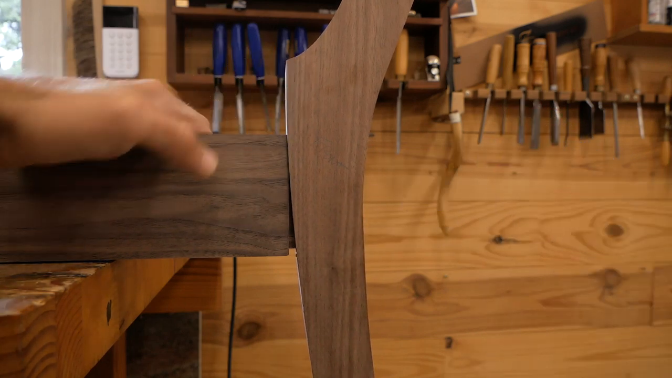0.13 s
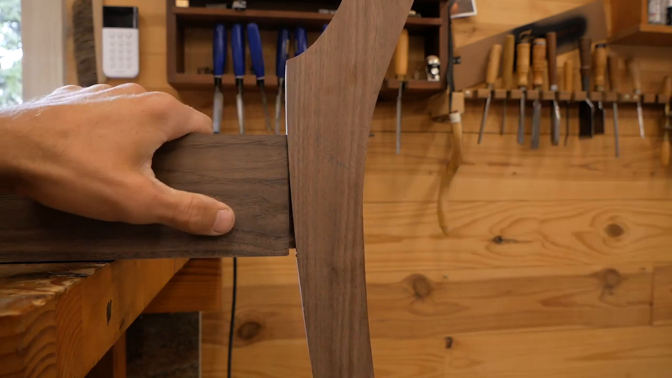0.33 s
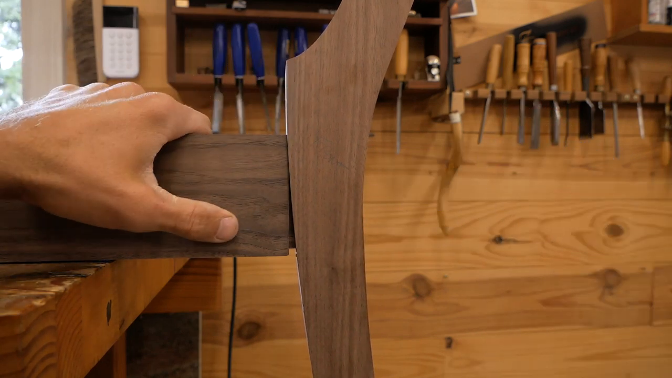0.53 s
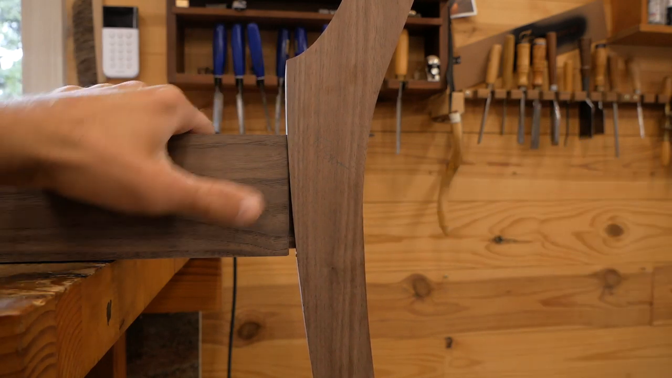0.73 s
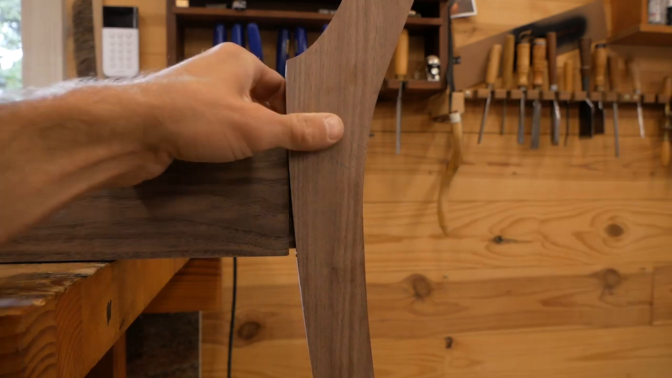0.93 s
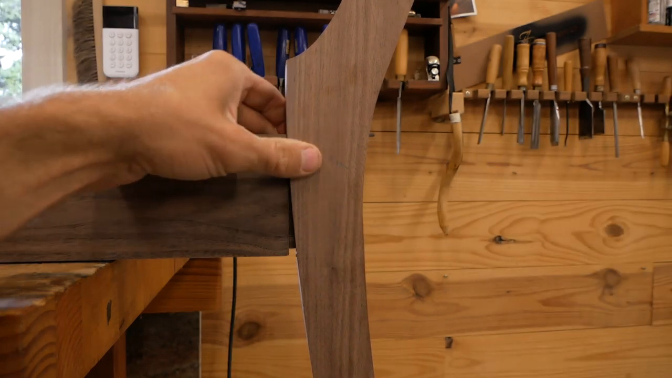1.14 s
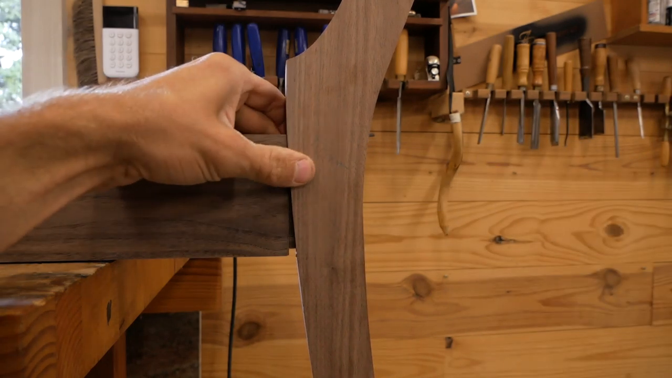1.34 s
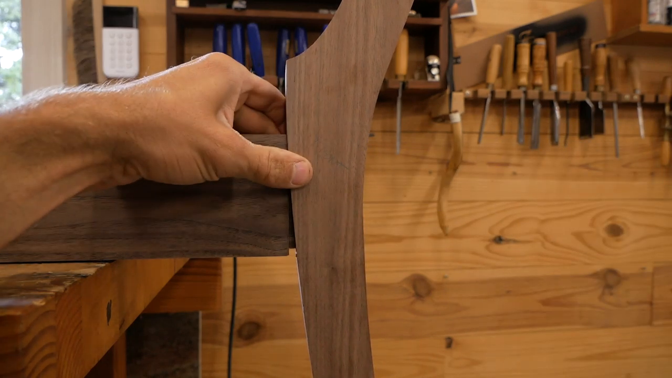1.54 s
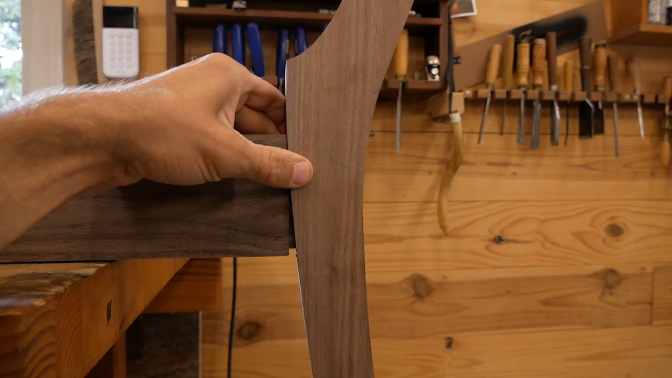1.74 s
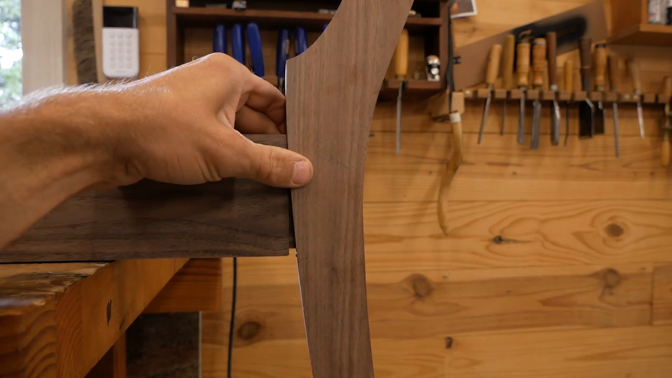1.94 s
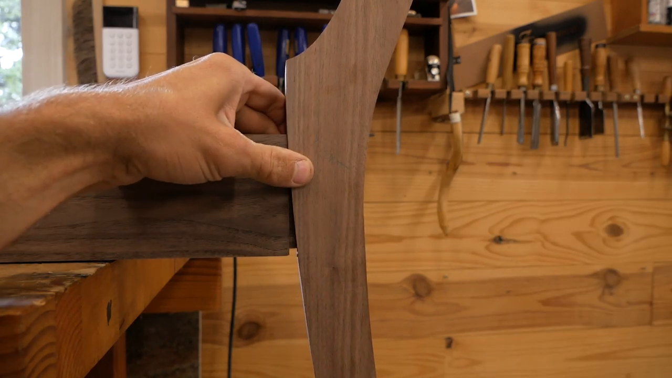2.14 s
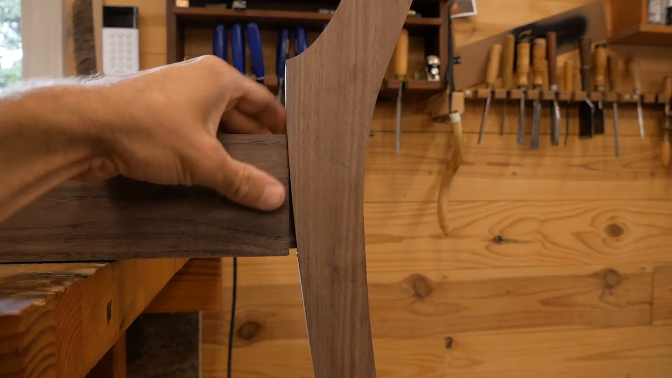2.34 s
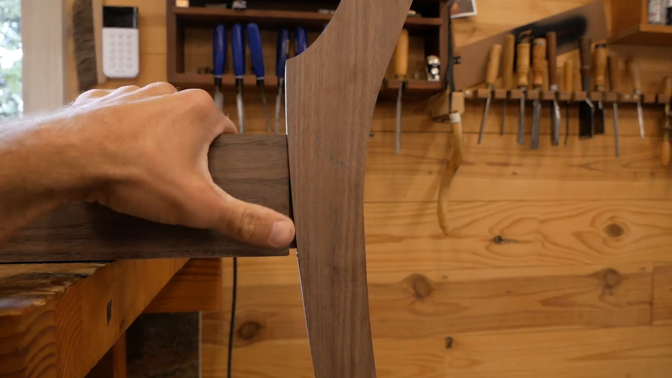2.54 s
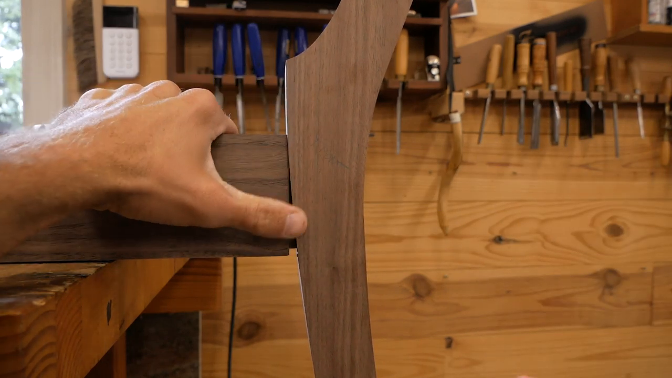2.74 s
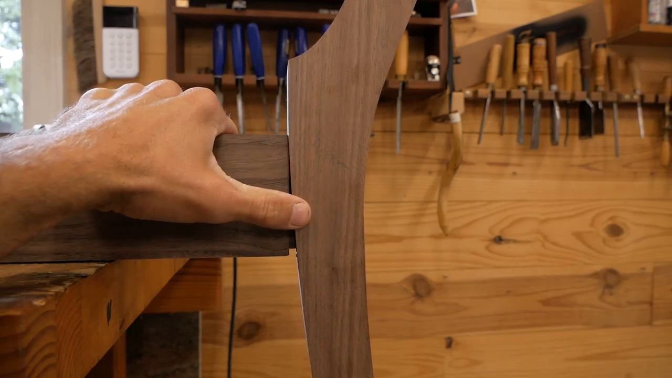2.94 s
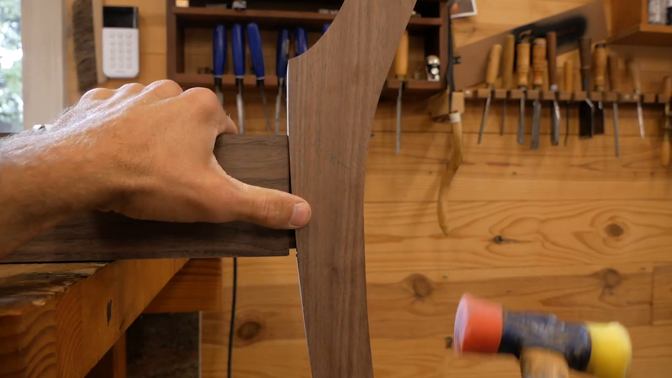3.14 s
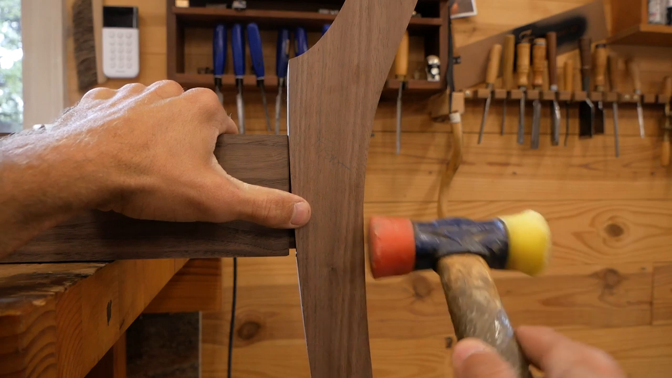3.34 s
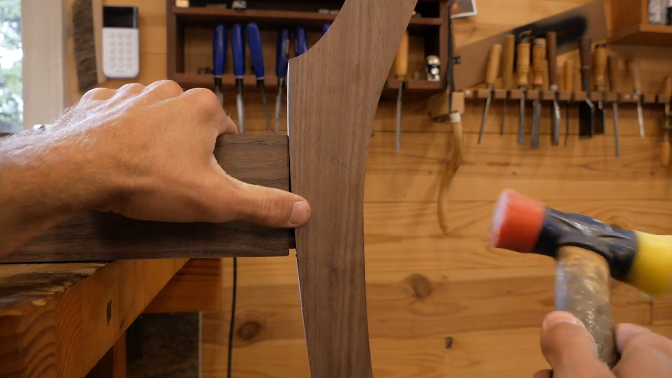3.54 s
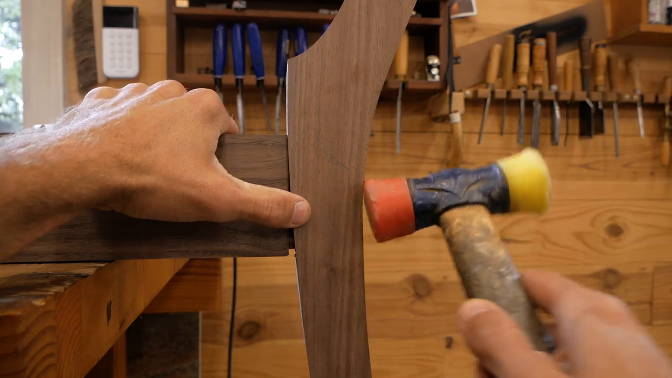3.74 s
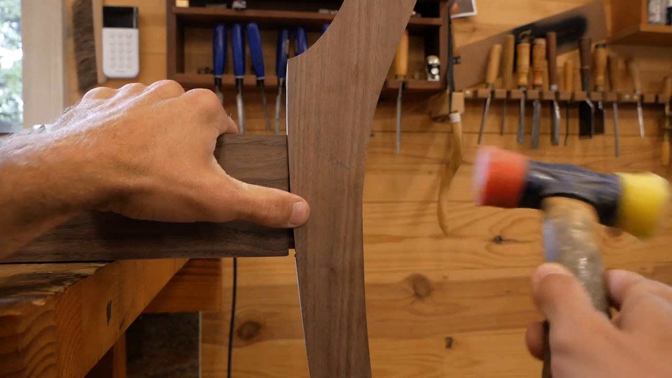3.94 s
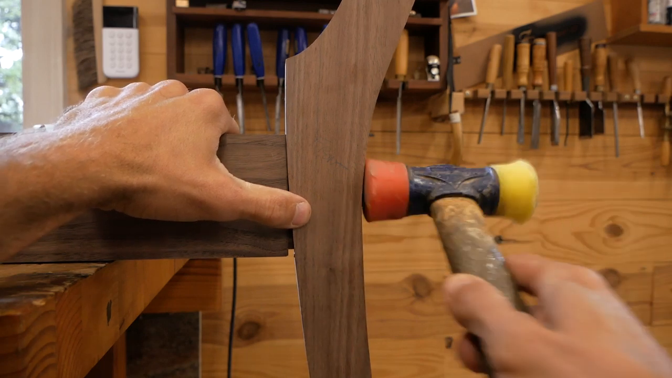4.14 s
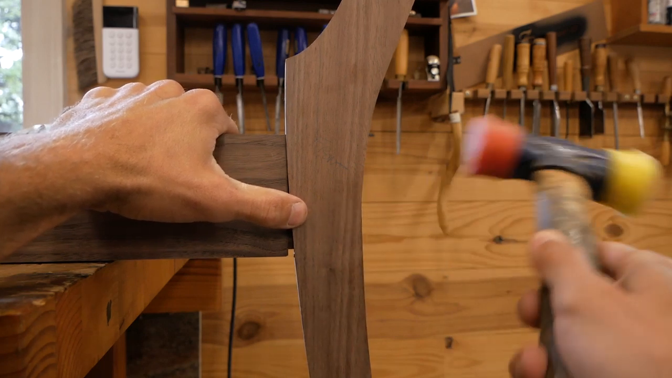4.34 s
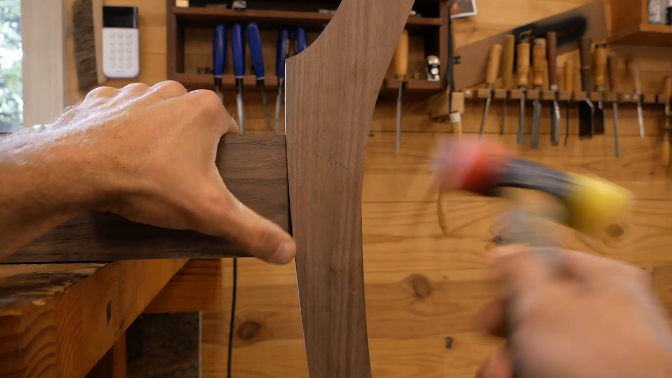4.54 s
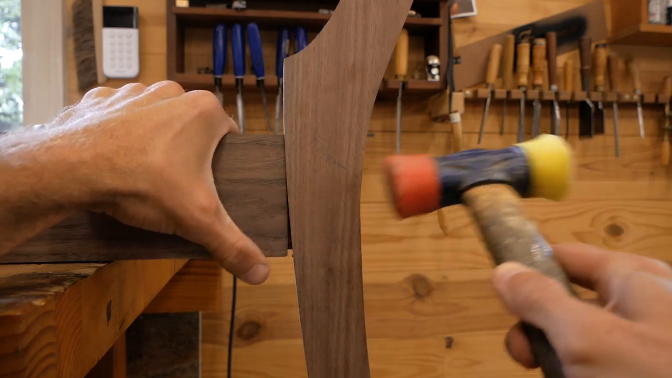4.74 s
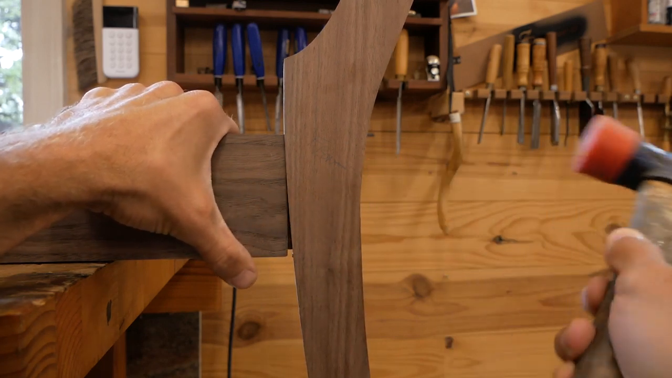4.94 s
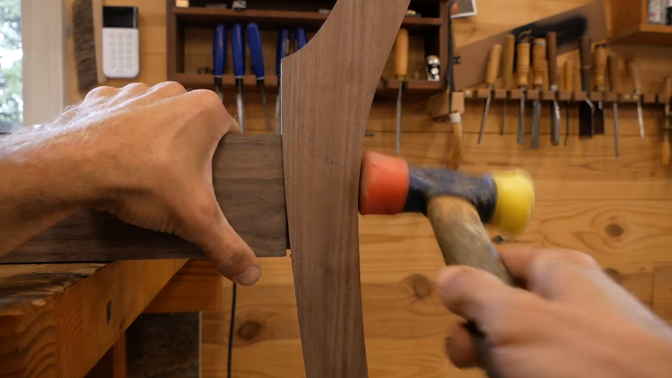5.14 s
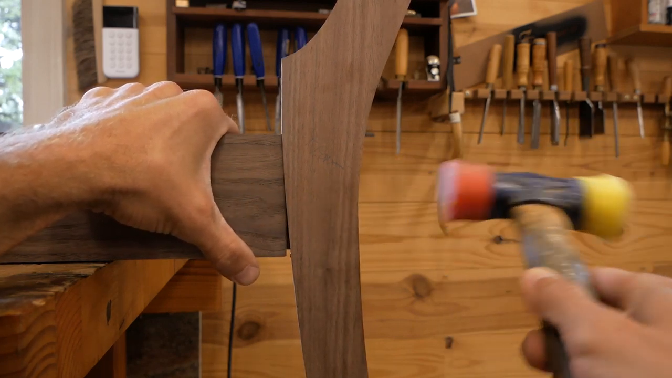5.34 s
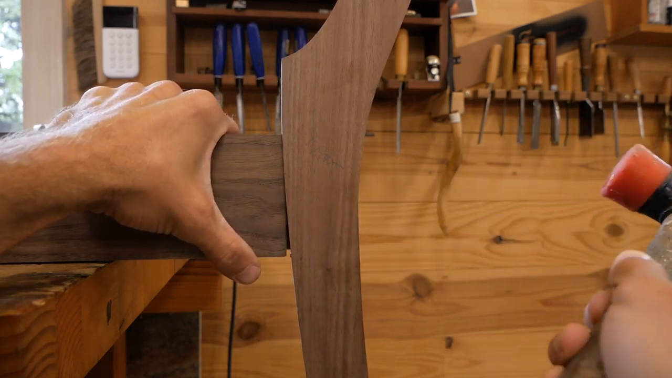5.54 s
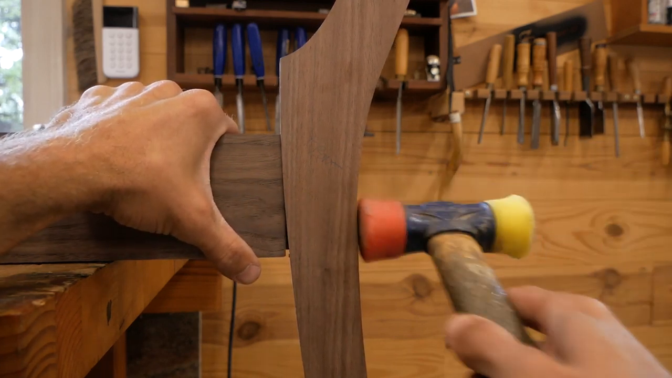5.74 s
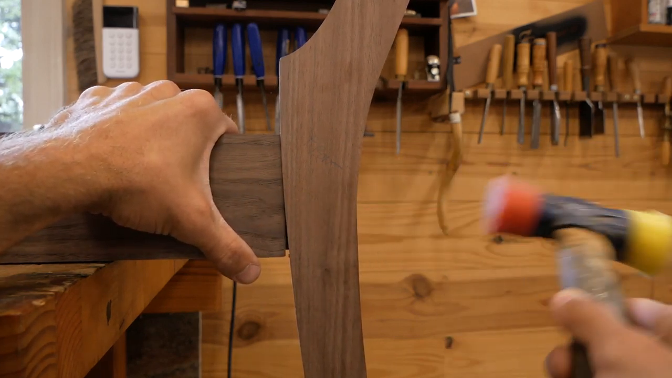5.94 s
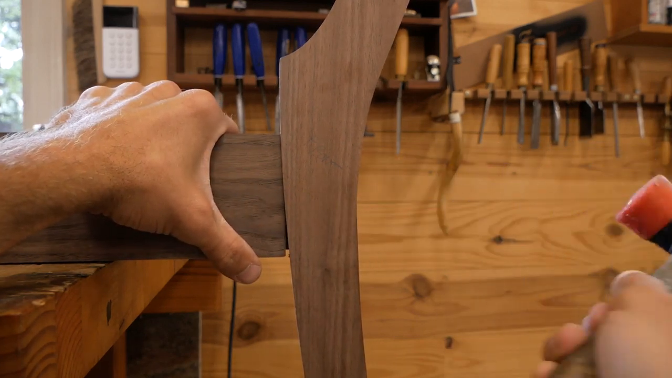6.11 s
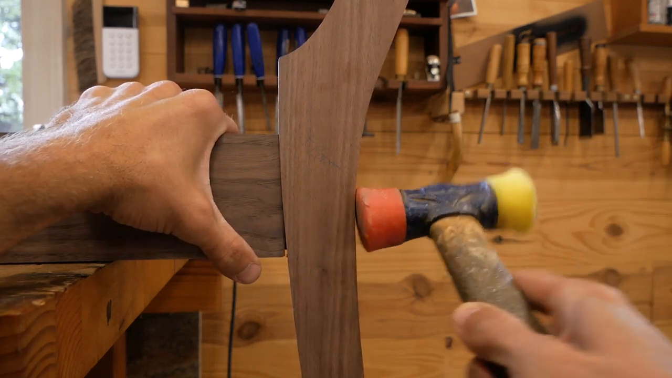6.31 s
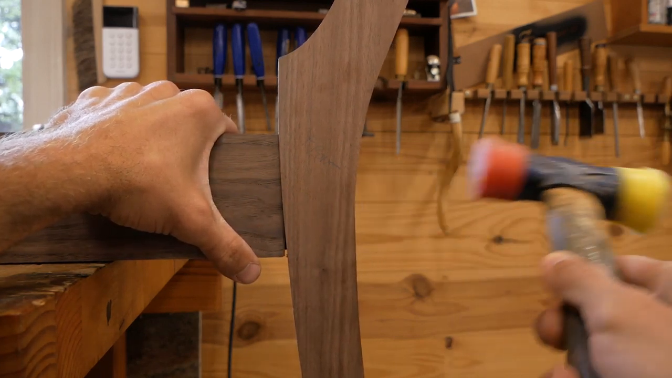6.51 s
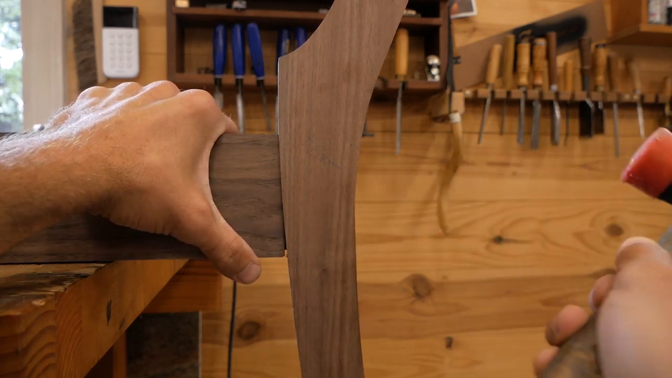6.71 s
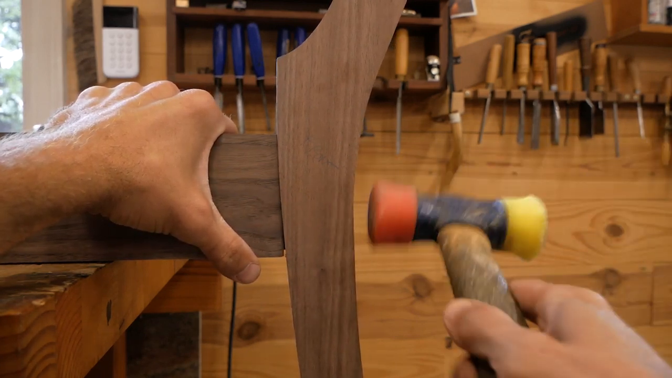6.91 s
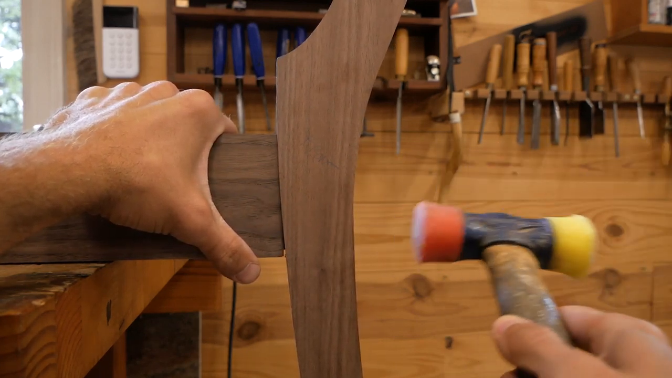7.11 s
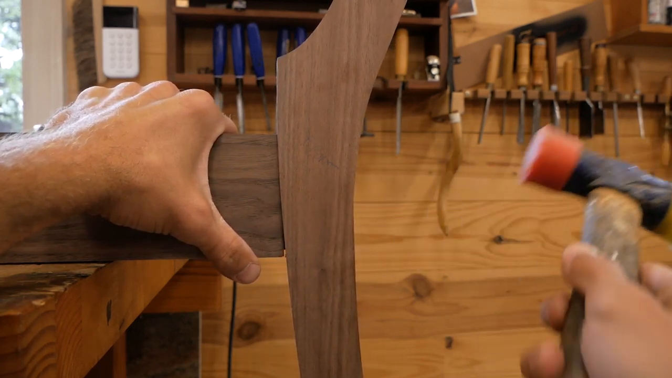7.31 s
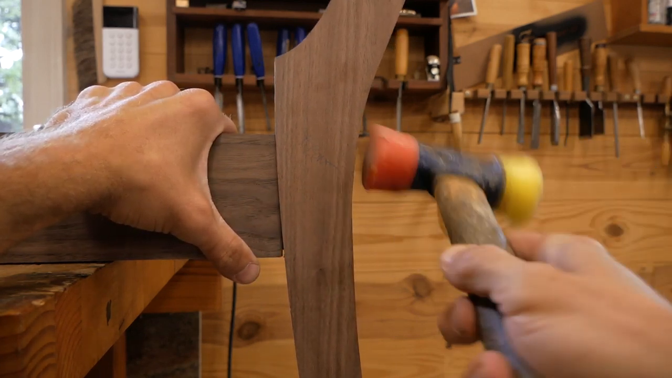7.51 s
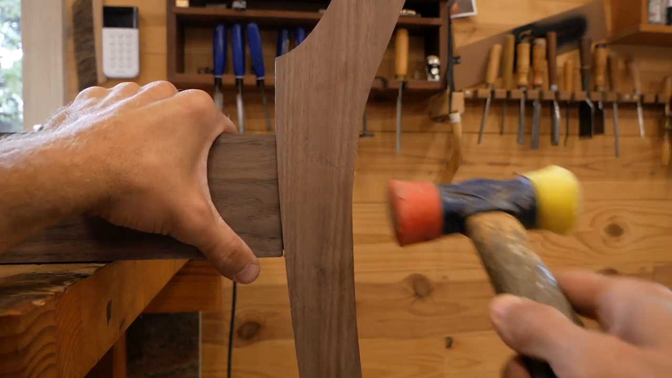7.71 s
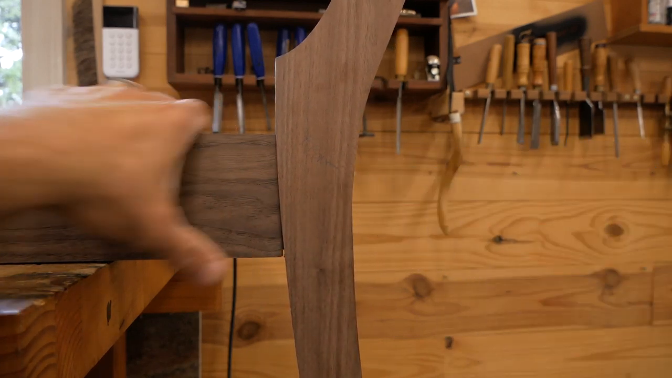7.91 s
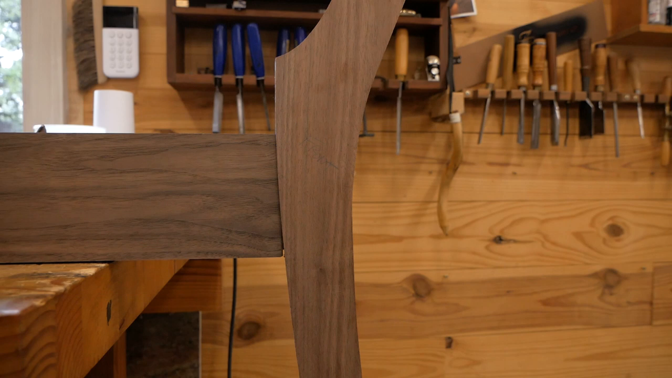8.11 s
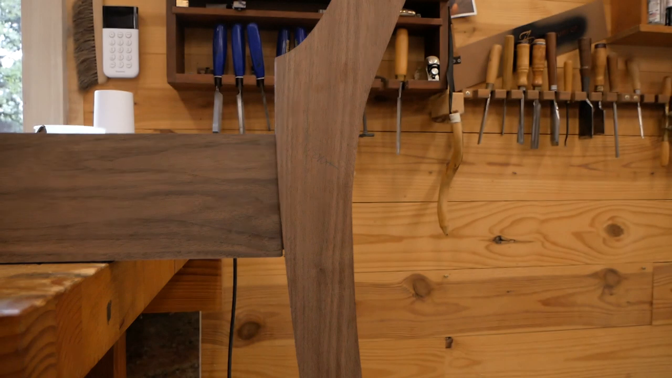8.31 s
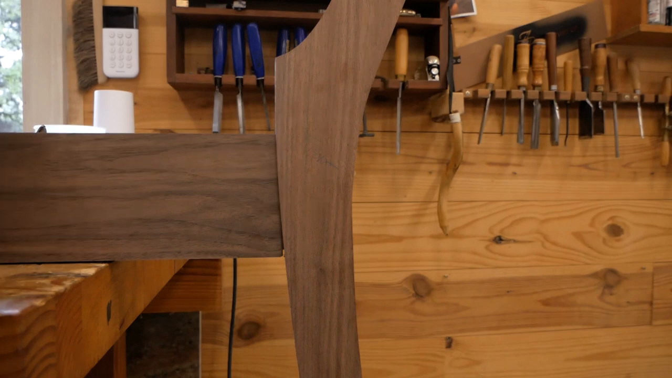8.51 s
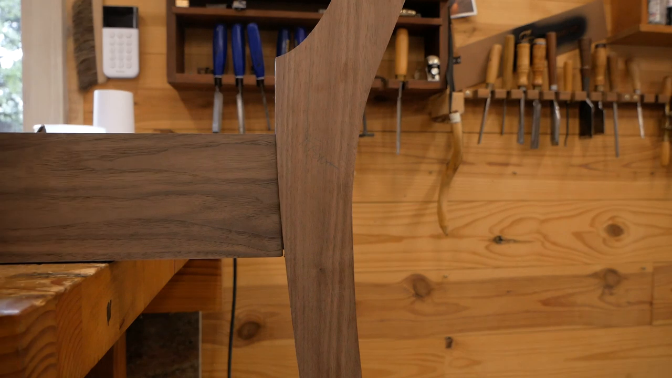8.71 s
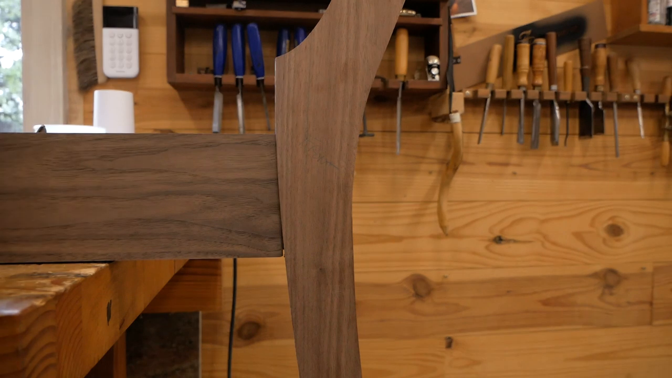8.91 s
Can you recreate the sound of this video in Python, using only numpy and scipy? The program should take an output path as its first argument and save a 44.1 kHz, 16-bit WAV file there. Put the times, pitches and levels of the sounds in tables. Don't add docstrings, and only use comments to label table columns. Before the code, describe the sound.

Skin hisses and ticks on wood, then twelve resonant mallet knocks with dull rebounds ring through timber and bench, ending in more hand rubbing.

```python
import sys
import numpy as np
from scipy import signal
from scipy.fft import rfft, irfft, next_fast_len
from scipy.io import wavfile
from scipy.ndimage import uniform_filter1d

SR = 44100
rng = np.random.default_rng(int(sys.argv[2]) if len(sys.argv) > 2 else 0)


def file_out(sig):
    cols = np.atleast_2d(sig).T
    lim = np.clip(cols, -1, 1)
    pcm = np.round(lim * 32767).astype(np.int16)
    wavfile.write(sys.argv[1], SR, pcm)


def invert_db(level):
    return 10 ** (np.asarray(level, dtype=float) / 20)


N = 399546


def evened(x):
    return x / np.sqrt(np.mean(x ** 2) + 1e-20)


def read(points, hz):
    f, value = np.transpose(points)
    return np.interp(np.log(hz + 1), np.log(f + 1), value)


def add(mix, s, sound):
    part = mix[round(s * SR):][:len(sound)]
    part += sound[:len(part)]


def colour(x, points):
    size = next_fast_len(len(x))
    gain = invert_db(read(points, np.fft.rfftfreq(size, 1 / SR)))
    return irfft(rfft(x, size) * gain, size)[:len(x)]


def noise(points, patchy_db):
    a, b, patches = rng.standard_normal((N // 128 + 6, 257, 3)).T
    patches = uniform_filter1d(patches, size=8, axis=0)
    patches = evened(uniform_filter1d(patches, size=12, axis=1))
    colour_db = read(points, np.fft.rfftfreq(512, 1 / SR))[:, None]
    z = (a + 1j * b) * invert_db(colour_db + patchy_db * patches)
    return evened(signal.istft(z, nperseg=512, noverlap=384)[1][:N])


def ring(modes, t, rise_cycles):
    hz, db, t60 = modes.T[:, :, None]
    sign = (-1) ** np.arange(len(hz))[:, None]
    rise = 1 - np.exp(-t * hz / rise_cycles)
    tones = sign * invert_db(db - 60 * t / t60) * rise * np.sin(2 * np.pi * hz * t)
    return tones.sum(0)


# (frequency [Hz], level [dB per Hz])
AIR_COLOUR = [(20, -28.5), (40, -17.5), (65, -3), (120, -5), (200, -2.5), (400, -9), (650, -7),
              (1000, -14.5), (1500, -20.5), (3000, -25), (8000, -28.5), (14000, -30.5), (15500, -37),
              (16500, -68)]
# (frequency [Hz], level [dB])
AIR_WIDTH = [(60, -19.5), (180, -28.5), (550, -19.5), (1650, -11), (4970, -3.5), (15000, -3.5)]


def quiet_background():
    air_db = -67
    differing = invert_db(air_db) * colour(noise(AIR_COLOUR, patchy_db=.5), AIR_WIDTH)
    shared = invert_db(air_db) * noise(AIR_COLOUR, patchy_db=.8)
    return shared, differing


# (frequency [Hz], time to fall 60 dB [s])
ROOM_DECAY = [(100, 0.39), (300, 0.46), (700, 0.38), (1800, 0.43), (4800, 0.32), (9000, 0.5),
              (14000, 0.076)]
# (frequency [Hz], level [dB])
WALL_COLOUR = [(100, 14.5), (400, -4), (1000, -8), (3000, -5), (8000, -23), (14000, -32.5)]


def workshop(x):
    out, turn = np.zeros(N), np.arange(N) / SR * 1.7
    fading = invert_db(-60 * np.arange(SR) / SR / 0.38)
    for k in range(3):
        taps = np.zeros(SR)
        at = np.arange(140, SR - 20, 20)
        taps[at + rng.integers(0, 20, len(at))] = rng.choice([-1., 1.], len(at))
        hz, t, z = signal.stft(taps, SR, nperseg=256)
        tail_db = read(WALL_COLOUR, hz)[:, None] - 60 * t / read(ROOM_DECAY, hz)[:, None]
        tail = signal.istft(z * invert_db(tail_db), SR, nperseg=256)[1]
        share = np.sqrt(2 / 3) * np.cos(np.pi * (turn + k / 3))
        out += signal.fftconvolve(x * share, tail / np.linalg.norm(taps * fading))[:N]
    return out


# (start [s], length [s], hiss level [dB], dull drag level [dB])
STROKES = [(-.05, 0.38, -63, -65), (.33, 0.11, -71, -75), (0.453, 0.096, -61.5, -62.5),
           (0.556, 0.053, -70, -69), (0.655, 0.24, -62.5, -65.5), (0.909, 0.081, -57.5, -62),
           (1.065, 0.15, -66.5, -62), (1.217, 0.076, -66.5, -66), (1.284, 0.28, -75, -67),
           (2.285, 0.13, -72.5, -65), (2.403, 0.079, -67, -72), (2.48, 0.14, -75, -66.5),
           (3.59, .09, -68.5, -65), (6.123, 0.081, -73.5, -78), (7.86, 0.31, -65, -62),
           (8.035, 0.079, -60, -60), (8.119, 0.099, -56, -60), (8.227, 0.25, -59.5, -65),
           (8.49, 0.098, -60.5, -64), (8.583, 0.056, -58, -67), (8.644, 0.14, -69.5, -66.5),
           (8.79, 0.13, -75, -72), (8.941, 0.063, -69, -62), (9.02, .1, -70.5, -77.5)]


def strokes(column, lift_s):
    grip_s, linger_db, linger_s = .022, -9, .06
    restless_db = 1.2
    t, power = np.arange(0, N + 64, 64) / SR, 0
    for row in STROKES:
        start, length = row[:2]
        rise = np.exp(np.minimum(t - start - grip_s, 0) / grip_s)
        after = np.maximum(t - start - length, 0)
        fade = np.maximum(np.exp(-after / lift_s), invert_db(linger_db) * np.exp(-after / linger_s))
        power = power + (invert_db(row[column]) * rise * fade) ** 2
    restless = evened(uniform_filter1d(rng.standard_normal(len(t)), size=14))
    return np.interp(np.arange(N) / SR, t, np.sqrt(power) * invert_db(restless_db * restless))


# (frequency [Hz], level [dB per Hz])
HISS_COLOUR = [(470, -27.5), (800, 0), (907, -4), (1950, -0.5), (2100, -2), (3790, -4.5), (14100, -11),
               (15000, -16), (16000, -22.5)]
# (frequency [Hz], level [dB per Hz])
DRAG_COLOUR = [(30, -27), (60, -1), (150, -3.5), (400, 2.5), (800, -1), (1500, -11), (2500, -27.5),
               (5000, -57.5)]


def sliding():
    hiss, drag = strokes(column=2, lift_s=.016), strokes(column=3, lift_s=.04)
    grit = rng.standard_normal(N)
    grit *= invert_db(3.5 * np.minimum(rng.exponential(1, N), 4))
    grit *= rng.random(N) < 700 / SR
    hissing = evened(noise(HISS_COLOUR, patchy_db=.8) + .3 * evened(colour(grit, HISS_COLOUR)))
    return hiss * hissing + drag * noise(DRAG_COLOUR, patchy_db=1.2)


# (time [s], peak level [dB], centre frequency [Hz])
TICKS = [(.300, -38, 9000), (0.4675, -40, 6000), (.475, -41, 11000), (.481, -44, 5200), (0.4966, -22, 5150),
         (.523, -35, 5000), (.540, -42, 7000), (.557, -44, 3000), (.577, -46, 1500), (.600, -49, 4000),
         (0.7598, -39, 1630), (3.672, -50, 4000), (.923, -39, 6000), (.958, -34, 6000),
         (1.212, -46.5, 1360), (1.397, -49.5, 1500), (1.464, -52, 5000), (2.055, -48, 3890),
         (6.211, -46, 6040), (8.254, -40, 4990), (8.295, -46.5, 3000), (8.325, -39, 7000),
         (8.346, -39, 6000), (8.401, -40, 7000), (8.585, -40, 5940), (8.653, -40, 7000),
         (8.708, -43.5, 2610), (8.782, -45, 1500), (8.958, -44, 3500), (8.973, -40.5, 4970)]


def skin_ticks():
    out, t = np.zeros(N), np.arange(-40, 1200) / SR
    for s, db, hz in TICKS:
        u = 4.4 * t * hz
        after = 0.065 * rng.standard_normal(len(t)) * np.exp(-abs(t) / 0.0018) * (t > 0)
        add(out, s, invert_db(db) * (-2.3 * u * np.exp(-u ** 2) + after))
    return out


# (time [s], peak level [dB], push length [s])
THUMPS = [
    (0.76, -34, 0.0015),
    (0.897, -49.5, 0.0032),
    (1.212, -49, 0.00082),
    (1.398, -46, 0.00084),
    (1.45, -58, 0.0012),
    (7.884, -40.5, 0.0018),
    (8.53, -68, 0.0022),
]


def palm_thumps():
    out, t = np.zeros(N), np.arange(1240) / SR
    for s, db, length in THUMPS:
        u = t / length - 1.2
        add(out, s, invert_db(db) * (1 - 1.95 * u ** 2) * np.exp(-u ** 2 / (1.3 + 0.72 * (u > 0))))
    return out


# (time [s], level [dB], frequency [Hz], length [s])
SQUEAKS = [(1.08, -80, 8200, .09), (1.456, -51, 500, .02), (1.463, -70, 3300, .015),
           (1.553, -58, 480, .018), (1.557, -71, 3300, .015), (2.65, -80, 5100, .04),
           (7.66, -58, 1850, .12), (7.89, -63, 1860, .12), (7.994, -51, 980, .03), (7.997, -57, 1350, .025),
           (7.998, -50, 1850, .02), (8.022, -55, 950, .012), (8.94, -58, 560, .07), (8.96, -61, 1050, .04)]


def finger_squeaks():
    out = np.zeros(N)
    for s, db, hz, length in SQUEAKS:
        size = round(length * SR)
        band = signal.butter(2, [hz - 70, hz + 70], "bandpass", fs=SR)
        squeak = evened(signal.lfilter(*band, rng.standard_normal(size + 400))[400:])
        add(out, s, invert_db(db) * squeak * np.hanning(size))
    return out


def hand():
    return sliding() + skin_ticks() + palm_thumps() + finger_squeaks()


# (frequency [Hz], time to fall 60 dB [s])
BENCH_TONES = [(194, 1.1), (280, .65)]
# (frequency [Hz], level [dB per Hz])
THUD_COLOUR = [(25, -23.5), (60, -6.5), (110, -2.5), (170, 1), (260, -16), (500, -47)]
# (frequency [Hz], level [dB], time to fall 60 dB [s])
FRAME_HUM = [(403, 1.5, 0.53), (515, -5, 0.55), (783, -13.5, 0.85), (944, -7, 0.96), (3620, -15.5, 0.52)]
# (time in the air [s], hum level [dB], upper bench ring level [dB])
ROCKS = [(0.069, -49, -64.5), (0.24, -36.5, -35), (0.27, -38, -56.5), (.16, -51, -33), (0.11, -39.5, -40.5),
         (0.18, -37.5, -38), (0.31, -34.5, -32.5), (0.23, -33, -34.5), (.24, -36.5, -31.5),
         (0.18, -34, -35), (.24, -35, -39.5), (0.164, -39, -33)]


def bench():
    thud_db, low_ring_db = -39, -42.5
    follows = 0.21
    out, t = np.zeros(N), np.arange(SR) / SR
    short = t[:SR // 2]
    hz, t60 = np.transpose(BENCH_TONES)
    for (s, db, *_), (settles, hum_db, high_db) in zip(BLOWS, ROCKS):
        felt_db = follows * db
        thud = evened(colour(rng.standard_normal(SR), THUD_COLOUR))
        thud = thud * invert_db(felt_db + thud_db - 60 * t / 0.17) * (1 - np.exp(-t / 0.0092))
        rings = ring(np.array([hz, [felt_db + low_ring_db, high_db], t60]).T, t, rise_cycles=6.0)
        hum = 0
        for mode in FRAME_HUM:
            waver = 0.79 + evened(uniform_filter1d(rng.standard_normal(SR // 2), size=500))
            hum = hum + waver * ring(np.array([mode]), short, rise_cycles=5.5)
        add(out, s, thud + rings)
        add(out, s, invert_db(hum_db) * hum * np.exp(-np.maximum(short - settles, 0) / 0.0057))
    return out


# (frequency [Hz], level [dB], time to fall 60 dB [s])
WOOD_TONES = [(108, -30, 0.42), (142, -30, 0.37), (228.4, -12.5, 0.17), (304, -11, 0.17), (369.8, -7, .15),
              (405.8, -4, 0.18), (435.2, -3, .2), (481.5, -7.5, 0.2), (536, -6, .18), (607, -7.5, 0.48),
              (688, -7.5, .15), (763.2, -5, .15), (844, -6, 0.068), (910, 0, 0.43), (1006, -3, 0.23),
              (1072, -3.5, 0.42), (1186, -10, 0.15), (1303, -7.5, .1), (1404, -9.5, .12),
              (1561, -10.5, .12), (1720, -9.5, 0.043), (1830, -7, 0.22), (1990, -7.5, 0.21),
              (2114, -5.5, 0.22), (2300, -6, .1), (2572, -7, 0.1), (3000, -9, 0.14), (3330, -1, 0.22),
              (3670, 1, 0.034), (4590, -10.5, 0.031)]


def knock(rail_db, leg_db, top_db, crack_db, chatter_s):
    t = np.arange(8000) / SR
    hz, db, t60 = np.transpose(WOOD_TONES)
    struck = [(330, leg_db - 5.5), (400, rail_db), (470, rail_db), (640, leg_db), (1100, leg_db),
              (1700, top_db), (3600, crack_db - 5.5)]
    pitch_spot, level_spot = rng.standard_normal((2, len(hz)))
    level_db = db + read(struck, hz) - 0.5 + 2.2 * level_spot
    damped = np.minimum(.6 * t60, np.clip(62 / hz, .03, .14))
    wood = ring(np.array([hz * (1 + 0.011 * pitch_spot), level_db, damped]).T, t, rise_cycles=0.63)
    slips = rng.standard_normal(8000) * (rng.random(8000) < .06) * .19 * invert_db(-60 * t / chatter_s)
    slips[0] = 1
    return signal.fftconvolve(wood, slips / np.linalg.norm(slips))


def leading_notes(leg_db, rail_db, leg_hz):
    rail_hz = 424 + 1.05 * np.clip(rail_db, -8, 5)
    pair = [(rail_hz, leg_db + rail_db - 6.5, .11), (leg_hz, leg_db - 8.5, .09)]  # (Hz, dB, s)
    return ring(np.array(pair), np.arange(SR // 4) / SR, rise_cycles=1.8)


# (frequency [Hz], level [dB per Hz])
CRACK_COLOUR = [(590, -33), (1000, -2.5), (1850, 4.5), (2410, -3.5), (3580, -3.5), (8450, -10),
                (9600, -11.5), (13800, -26.5), (16000, -40)]
# (frequency [Hz], level [dB], time to fall 60 dB [s])
CRACK_RETURN = [(800, -30.5, .3), (1500, -8, 0.63), (3500, -2.5, 0.52), (7000, -10, 0.54),
                (10500, -14, 0.4), (15300, -17, 0.13), (16700, -39.5, .2)]


def crack(crack_db):
    t = np.arange(4096) / SR - .003
    fall = np.exp(-t / .0018) + 0.19 * np.exp(-t / 0.015)
    burst = np.where(t < 0, .05, fall) * np.minimum((t + 0.0042) / 0.0015, 1)
    snap = invert_db(4.0) * evened(colour(rng.standard_normal(4096), CRACK_COLOUR)) * burst
    u = (t - .0004) / .00008
    slap = invert_db(7) * (1 - 2 * u ** 2) * np.exp(-u ** 2)

    hz, late, z = signal.stft(rng.standard_normal(SR // 2), SR, nperseg=1024)
    f, db, t60 = np.transpose(CRACK_RETURN)
    start_db = read(np.transpose([f, db]), hz)[:, None]
    z = z * invert_db(start_db - 60 * late / read(np.transpose([f, t60]), hz)[:, None])
    tools_db = 2 * rng.standard_normal((len(hz), 1))
    out = invert_db(-12.0) * signal.istft(z * invert_db(tools_db), SR, nperseg=1024)[1]
    out *= np.clip((np.arange(len(out)) / SR - .004) / 0.002, 0, 1)
    add(out, 0, snap - slap)
    return invert_db(crack_db) * out


# (time [s], strength [dB], rail against leg [dB], crack against leg [dB], leg note [Hz])
BLOWS = [(1.668, -28, -2, -13.5, 905), (2.076, -16.5, 3.5, -5, 950), (2.936, -13.5, -4, -9, 999),
         (3.365, -12.5, 6, -11.5, 910), (3.731, -11.5, 2, -4.5, 1113), (4.152, -10, -0.5, -6.5, 929),
         (4.637, -9.5, -5, -4.5, 910), (5.173, -9.5, -5.5, -3.5, 896), (5.76, -9.5, -5, -6.5, 887),
         (6.307, -10, -7.5, -0.5, 980), (6.943, -11, -1, -3.5, 1023), (7.562, -11, -7.5, -1.5, 932)]
# (time [s], strength [dB], rail against leg [dB])
REBOUNDS = [(2.095, -21.5, 1.5), (2.128, -24, -2.5), (2.315, -53, 13.5), (2.359, -58.5, 9),
            (2.402, -60, 6.5), (2.443, -56.5, 6.5), (2.487, -62, 6), (3.047, -50.5, 0.5),
            (3.423, -33.5, 12), (4.193, -23.5, 5), (4.253, -37, -2), (4.368, -50.5, 4), (4.695, -29.5, 7.5),
            (5.215, -23.5, 5.5), (5.809, -21.5, 3.5), (5.986, -55.5, 7), (6.351, -24.5, -1.5),
            (6.542, -52.5, 9.5), (7.019, -28.5, 5.5), (7.178, -53, 8.5), (7.582, -22.5, 0.5),
            (7.612, -28.5, 0)]


def mallet():
    wood, cracks = np.zeros(N), np.zeros(N)
    for s, db, rail_db, crack_db, leg_hz in BLOWS:
        top_db = db + 2.5 + 0.15 * crack_db
        add(wood, s, knock(db + rail_db, db, top_db, db + crack_db, chatter_s=0.13))
        add(wood, s + 0.0037, leading_notes(db, rail_db, leg_hz))
        add(cracks, s - .0022, crack(db + crack_db))
    for s, db, rail_db in REBOUNDS:
        leg_hz = [blow[4] for blow in BLOWS if blow[0] < s][-1]
        dull_db = db - 20
        add(wood, s, knock(db + rail_db, db, db + 3.5, dull_db, chatter_s=0.15))
        add(wood, s, leading_notes(db, rail_db, leg_hz))
        add(cracks, s, crack(dull_db))
    return wood, cracks


# (frequency [Hz], level [dB])
CLOSE_WIDTH = [(40, -21), (125, -27), (350, -38), (700, -42), (1400, -39), (2800, -32), (8000, -32),
               (14000, -22)]


def side_difference(near, skin):
    smear = rng.standard_normal(600) * np.exp(-np.arange(600) / 150)
    smeared = signal.fftconvolve(near + 1.5 * skin, smear / np.linalg.norm(smear))[:N]
    return colour(smeared, CLOSE_WIDTH)


def scene():
    wood, cracks = mallet()
    skin = hand()
    near = wood + invert_db(-6.5) * workshop(wood) + cracks + bench() + skin
    side = side_difference(near, skin)
    air, air_side = quiet_background()
    mid, side = near + air, side + air_side
    return np.array([mid + side, mid - side])


def roll_off(x):
    return signal.sosfilt(signal.butter(12, 16670, fs=SR, output="sos"), x)


def record(dry):
    thin = signal.sosfilt(signal.butter(2, 58, "highpass", fs=SR, output="sos"), dry)
    soft = 1.1 * np.tanh(thin / 1.05)
    edge = signal.firwin(255, 16300, window=("kaiser", 9), fs=SR)
    mix = signal.oaconvolve(soft, edge[None], "same")
    return roll_off(mix)


dry = scene()
out = record(dry)
file_out(out)
```